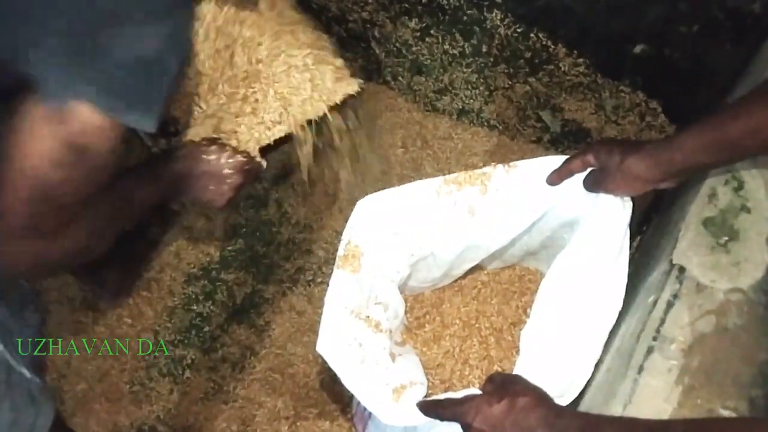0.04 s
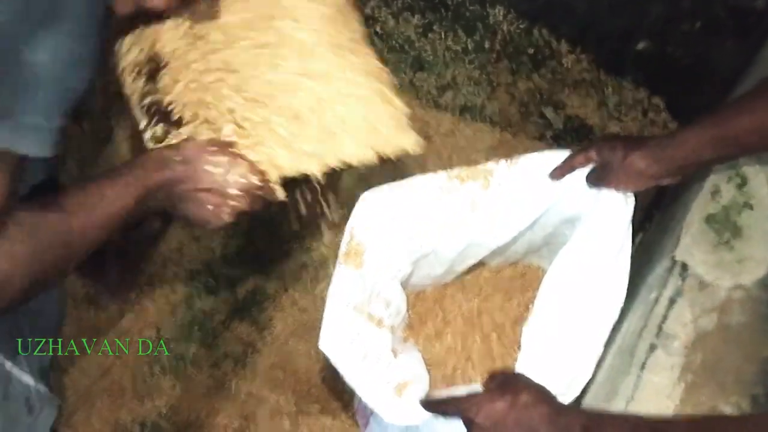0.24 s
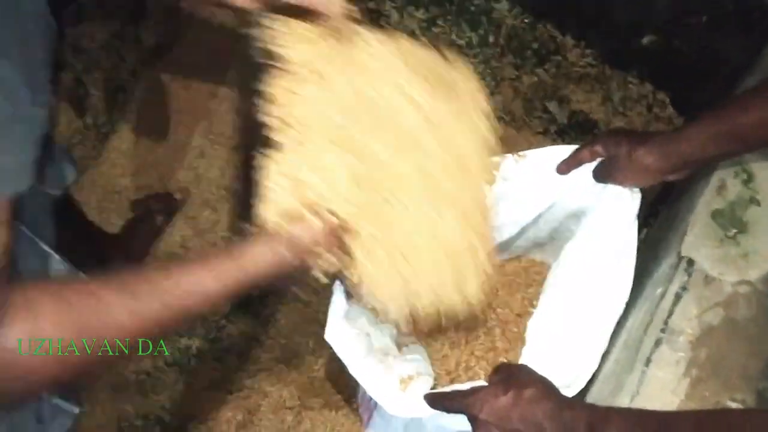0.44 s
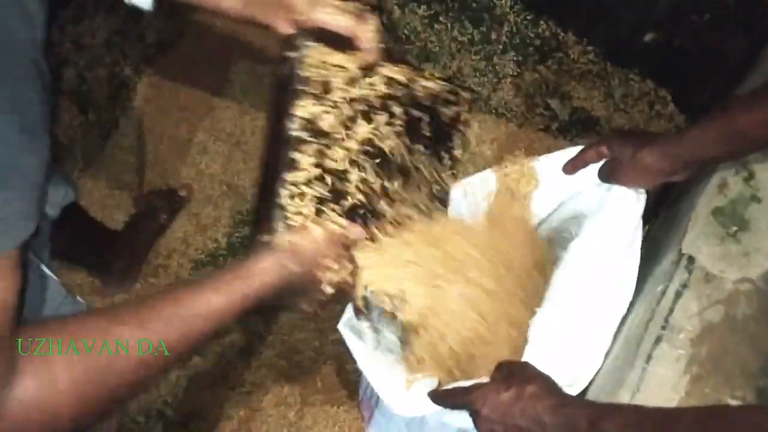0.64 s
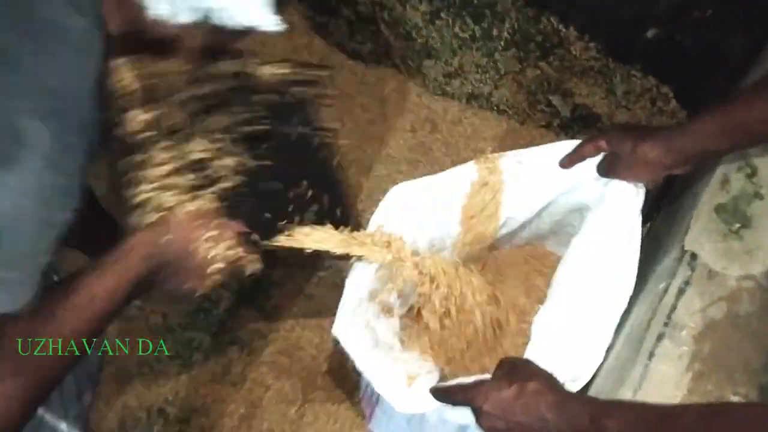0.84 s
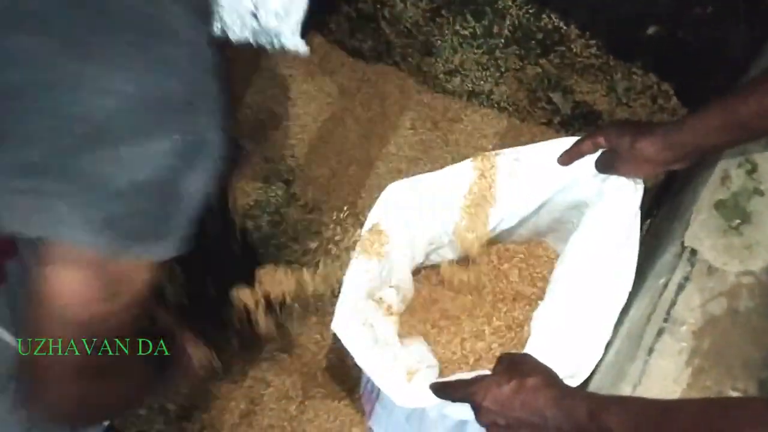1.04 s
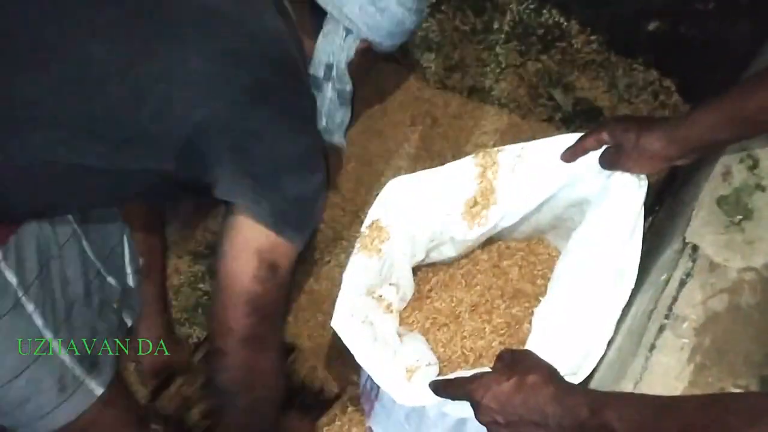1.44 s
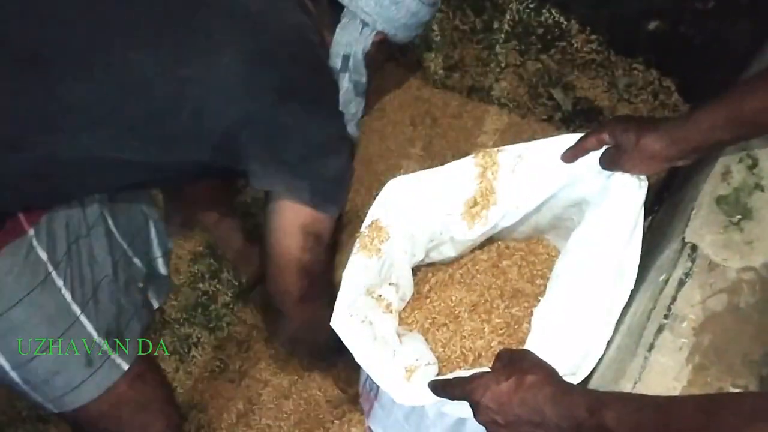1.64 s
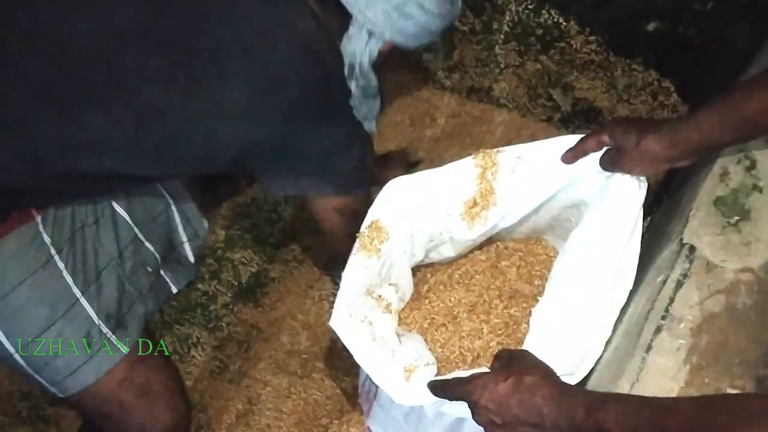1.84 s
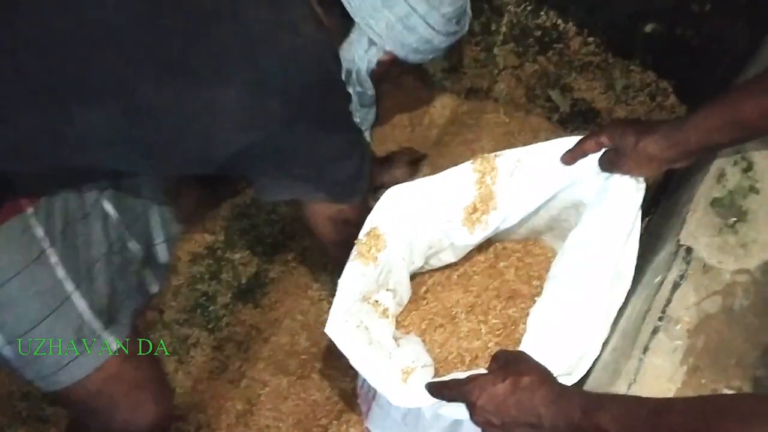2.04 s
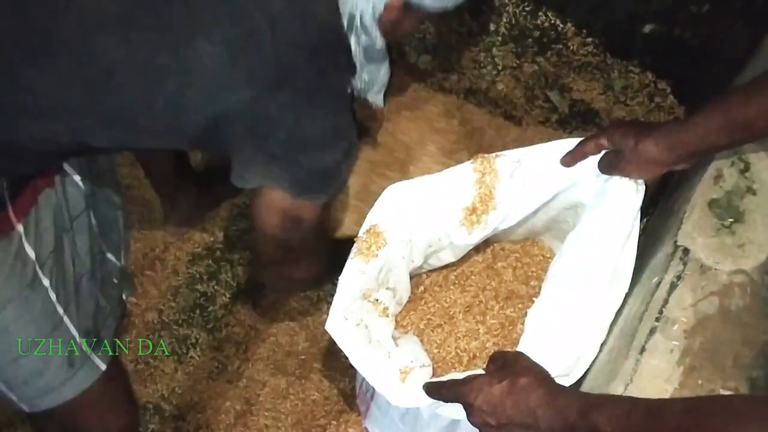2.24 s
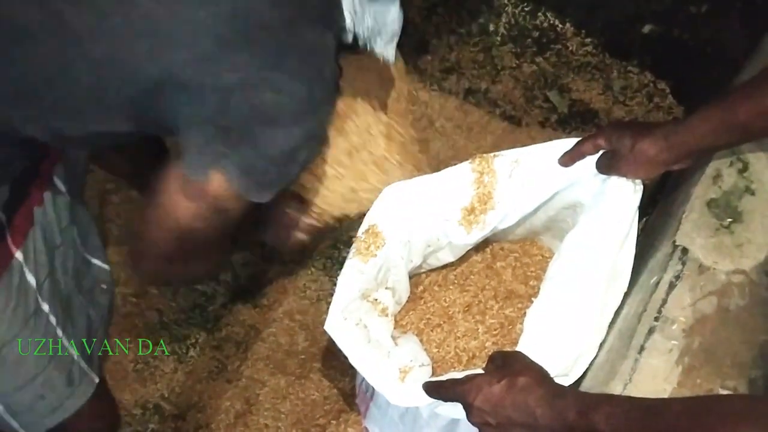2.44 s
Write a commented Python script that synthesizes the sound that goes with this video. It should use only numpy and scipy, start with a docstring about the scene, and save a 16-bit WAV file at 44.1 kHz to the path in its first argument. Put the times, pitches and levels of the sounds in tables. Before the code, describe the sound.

Close to the microphone outdoors, dry grain pours hissing into a sack and thins to a trickle. A scoop then pushes through the heap with a crunch, a brief rising scrape and light knocks, followed by coarser raking.

```python
"""Dry grain pours from a scoop into a woven sack, outdoors and close by.
Thousands of tiny impacts add up to a hiss off the scoop and a patter in the sack, where clumps excite
low, damped modes. After the last trickle the scoop is driven into the heap, crunching, knocking and
droning by friction, and more grain is raked onto it. A dull boom and a faint rustle lie underneath."""
import sys
import numpy as np
from scipy import signal
from scipy.fft import rfft, irfft
from scipy.io import wavfile
from scipy.ndimage import uniform_filter1d

SR = 44100
rng = np.random.default_rng(int(sys.argv[2]) if len(sys.argv) > 2 else 0)


def transcribe(u):
    """Save the signal u as a 16-bit wav file named by the first command-line argument.

    u: samples, shape (n,) or (channels, n), limited to [-1, 1]; the rate is SR.
    q: integer samples, one column per channel.
    """
    v = np.clip(np.atleast_2d(u).T, -1, 1)
    q = np.round(v * 32767).astype(np.int16)
    wavfile.write(sys.argv[1], SR, q)


N = 110250
TIME = np.arange(N) / SR
FREQS = np.maximum(np.arange(N // 2 + 1) * SR / N, 1)


# grain leaving the scoop: (time [s], rush level [dB], hiss level [dB])
SLIDING = [(0.17, -57, -49.5), (0.25, -37.5, -41), (0.40, -42.5, -50), (0.46, -41, -35),
           (0.52, -42.5, -32.5), (0.555, -28, -29), (0.62, -29, -26.5), (0.755, -36, -31.5),
           (0.88, -56, -45.5), (1.0, -56, -42.5), (1.13, -48, -43.5), (1.21, -50.5, -50.5)]
# spectra of the rush and the hiss: (frequency [Hz], gain [dB])
RUSH_SPECTRUM = [(500, -23), (1200, -2.5), (1950, 4.5), (3100, -2), (4300, -2), (6000, -1.5), (10000, -20)]
SLIDE_HISS_SPECTRUM = [(1500, -32), (4800, -15.5), (6500, 0.5), (8000, -1.5), (10000, -1), (14000, -1),
                       (16000, -3.5)]
# the scoop swinging past: (time [s], leftward pan [dB])
SWING = [(0.3, 0), (0.62, 1.5), (0.85, -6), (1.2, -8.5)]

def sliding():
    """Superposition: dense impacts merge into a rush and a hiss as the load slides off the scoop."""
    rush, hiss = envelopes(SLIDING)
    lag_s = 0.00003  # the raised scoop is near the middle
    rush = rush * shower(RUSH_SPECTRUM, per_s=11000, clump_db=0, shade=0.5, lag_s=lag_s)
    hiss = hiss * shower(SLIDE_HISS_SPECTRUM, per_s=21000, clump_db=0.9, shade=0.46, lag_s=lag_s)
    return from_db(5.5) * (rush + hiss) * pan(np.interp(TIME, *np.transpose(SWING)))


# grain landing in the sack: (time [s], level [dB])
LANDING = [(0.185, -58), (0.2, -35.5), (0.26, -35), (0.36, -28), (0.396, -33), (0.42, -28.5), (0.45, -33.5),
           (0.52, -36), (0.55, -34.5), (0.62, -31), (0.7, -27.5), (0.775, -30), (0.812, -30), (0.9, -34.5),
           (0.95, -33), (1.02, -32), (1.18, -40), (1.23, -47.5), (1.3, -55)]
# spectrum of the patter: (frequency [Hz], gain [dB])
LANDING_SPECTRUM = [(150, -14), (200, -0.5), (330, -4.5), (560, -0.5), (730, 1.5), (950, -2), (1300, 0.5),
                    (1600, -2), (1950, -0.5), (3100, -5), (4300, -4), (7000, -15.5), (15000, -22.5)]
# the sack's hollow under the main load: (time [s], level [dB], frequency [Hz])
HOLLOW = [(0.54, -45, 851), (0.62, -33.5, 750), (0.69, -34, 624), (0.77, -55, 566)]

def landing():
    """Cavity resonance: grain patters into the sack, whose hollow rings at a falling pitch."""
    level, = envelopes(LANDING)
    patter = level * shower(LANDING_SPECTRUM, per_s=8000, clump_db=1.56, shade=0.75, lag_s=0.00012)
    return from_db(3.5) * patter + resonance(HOLLOW, width_hz=55, pan_db=-1.5)


# clumps and soft bumps on the sack: (time [s], level [dB], leftward pan [dB])
THUDS = [(0.305, -32, 5), (0.35, -27, 6), (0.425, -26, 21), (0.778, -23.5, 18), (1.785, -34, 3),
         (1.886, -28, 17), (2.259, -34, -3)]
# modes of the sack: (frequency [Hz], gain [dB], 60 dB decay time [s])
SACK_MODES = [(105, -8.5, 0.088), (155, -5, 0.048), (189.5, -6.5, 0.12), (262, -5, 0.093), (390, -4, 0.033),
              (563, -4.5, 0.038)]

def sack_thuds():
    """Modal vibration: each soft blow excites the sack's low modes, slightly detuned every time."""
    thuds = np.zeros((2, N))
    for start, level_db, pan_db in THUDS:
        for hz, mode_db, t60 in SACK_MODES:
            detuned_hz = hz * (1 + 0.059 * rng.standard_normal())
            ring = damped_mode(start, detuned_hz, t60, contact_s=0.0022)
            thuds += from_db(level_db + mode_db - 4.5) * pan(pan_db) * ring
    return at_ports(*rfft(thuds))


# the scoop pushed through the heap: (time [s], crunch level [dB], hiss level [dB])
DIGGING = [(1.21, -48.5, -54), (1.23, -47.5, -40), (1.292, -45, -44), (1.302, -44, -33.5),
           (1.32, -35.5, -36.5), (1.36, -42.5, -40.5), (1.405, -41.5, -39.5), (1.452, -36, -30.5),
           (1.56, -32, -27), (1.65, -28.5, -24), (1.73, -27, -25.5), (1.81, -26.5, -25.5), (1.88, -33, -31),
           (1.95, -34.5, -37), (1.98, -42.5, -46), (2.1, -48.5, -74)]
# spectra of the crunch and of the husks' hiss: (frequency [Hz], gain [dB])
DIGGING_SPECTRUM = [(150, -20), (260, 1), (520, 1.5), (730, 4), (950, 1), (1300, 0), (1900, 3), (2500, 3),
                    (3600, -3), (6000, -11.5), (15000, -8)]
HUSK_SPECTRUM = [(1500, -17.5), (4000, -2.5), (6200, 1.6), (10000, 0), (14000, -0.5), (16000, -3)]

def digging():
    """Granular friction: husks crunch and hiss along the scoop as it enters the heap."""
    crunch, hiss = envelopes(DIGGING)
    crunch = crunch * shower(DIGGING_SPECTRUM, per_s=4000, clump_db=0.93, shade=0.65)
    hiss = hiss * shower(HUSK_SPECTRUM, per_s=16000, clump_db=0.9, shade=0.77)
    return from_db(4.5) * (crunch + hiss)


# the edge's low scrape and the scoop's two resonances: (time [s], level [dB], frequency [Hz])
EDGE_SCRAPE = [(1.3, -53.5, 310), (1.62, -38, 305), (1.78, -51, 285.4)]
LOWER_DRONE = [(1.4, -43.5, 440.6), (1.6, -38, 535), (1.635, -31, 554), (1.665, -24.5, 585.8),
               (1.705, -25.5, 596.7), (1.745, -32, 621), (1.81, -35.5, 635), (1.98, -49.5, 635)]
UPPER_DRONE = [(1.6, -45, 880), (1.68, -33, 928), (1.79, -34, 1013), (1.9, -42, 1044)]

def scoop_drone():
    """Frictional excitation: the edge scrapes under the heap and the scoop drones higher as it fills."""
    return (resonance(EDGE_SCRAPE, width_hz=49, pan_db=0)
            + resonance(LOWER_DRONE, width_hz=66, pan_db=1)
            + resonance(UPPER_DRONE, width_hz=66, pan_db=5))


# knocks and catches of the scoop: (time [s], level [dB], frequency [Hz], 60 dB decay time [s])
KNOCKS = [(0.267, -24.5, 470, 0.029), (0.263, -24.5, 192, 0.093), (0.301, -22.5, 533, 0.049),
          (0.429, -23, 357, .012), (0.786, -20.5, 293, 0.021), (1.308, -32.5, 438, 0.052),
          (1.643, -16.5, 511, 0.026), (1.656, -15, 570, 0.044), (1.731, -19.5, 1000, 0.059),
          (1.768, -21, 606, 0.028), (1.915, -26, 390, 0.018), (1.949, -21.5, 478, 0.032),
          (2.2004, -27, 950, 0.01), (2.209, -24.5, 415, 0.011), (2.2576, -26.5, 380, 0.0085)]

def knocks():
    """Free vibration: short knocks and catches on the scoop, with one low thump from the hand's grip."""
    rings = sum(from_db(db) * damped_mode(start, hz, t60, contact_s=0.0013)
                for start, db, hz, t60 in KNOCKS)
    spectrum = rfft(rings)
    return at_ports(spectrum, spectrum)


# grain raked onto the scoop: (time [s], crunch level [dB], hiss level [dB])
RAKING = [(2.152, -49.5, -58), (2.172, -34.5, -43), (2.205, -36, -36.5), (2.25, -36, -48.5),
          (2.3, -37.5, -57), (2.335, -36, -52), (2.4, -39, -48), (2.44, -43, -52), (2.5, -41.5, -54)]
# spectrum of its crunch: (frequency [Hz], gain [dB])
RAKING_SPECTRUM = [(150, -10), (200, 9), (350, -2), (520, 2), (700, -1), (950, 1.5), (1400, 2.5),
                   (1900, 3.5), (3100, -1), (6000, -8), (15000, -31)]

def raking():
    """Impact noise: sparser collisions give a coarser crunch as grain is swept onto the scoop."""
    crunch, hiss = envelopes(RAKING)
    crunch = crunch * shower(RAKING_SPECTRUM, per_s=2600, clump_db=1.55, shade=1.36)
    hiss = hiss * shower(HUSK_SPECTRUM, per_s=7700, clump_db=1.2, shade=1)
    return from_db(2.5) * crunch + from_db(7) * hiss


# short sprays of grain: (time [s], level [dB])
SPRAYS = [(0.264, -25.5), (0.346, -31), (0.539, -27), (0.94, -28), (1.02, -27), (1.219, -45), (1.299, -41),
          (1.945, -31), (2.199, -23), (2.332, -32)]
# their spectrum: (frequency [Hz], gain [dB])
SPRAY_SPECTRUM = [(300, -5), (1000, 4), (2000, 5), (5000, 3.5), (9000, 3), (15000, -41)]

def sprays():
    """Broadband transients: handfuls of grain strike almost at once."""
    level = sum(from_db(db) * burst(start, attack_s=0.0011, decay_s=0.011) for start, db in SPRAYS)
    return level * shower(SPRAY_SPECTRUM, per_s=4600, clump_db=2, shade=1)


# dull boom under the handling: (time [s], level [dB])
BOOM = [(0, -57), (0.19, -62), (0.29, -35), (0.45, -45), (0.649, -49), (0.86, -47), (1.2, -52.5),
        (1.899, -52), (2.13, -57), (2.281, -47.5), (2.5, -53)]

def boom(hz=200.4):
    """Narrowband noise: one low resonance swells and fades at a steady pitch."""
    return resonance([(time, db, hz) for time, db in BOOM], width_hz=23.3, pan_db=-2)


# loose grain settling: (time [s], level [dB])
SETTLING = [(0, -38.5), (0.15, -38.5), (1.0, -41), (2.1, -43), (2.5, -41.5)]
# spectrum of rustle and air: (frequency [Hz], gain [dB])
SETTLING_SPECTRUM = [(30, -14), (140, -12), (200, 2.5), (450, -2), (1300, -6.5), (3800, -4), (5500, -3),
                     (7700, 0.5), (15500, -3.5)]

def settling():
    """Noise floor: the tiny impacts of settling grain blend into a faint, continuous rustle."""
    level, = envelopes(SETTLING)
    return level * shower(SETTLING_SPECTRUM, per_s=13000, clump_db=1, shade=0.65)


def from_db(db):
    """Amplitude ratio: a factor of ten for every 20 dB."""
    return 10 ** (np.asarray(db) / 20)


def rms_one(x):
    """Normalisation to unit mean power."""
    return x / np.sqrt(np.mean(x ** 2) + 1e-20)


def pan(db):
    """Level difference: left and right gains that lie db apart."""
    return from_db(np.vstack([db, -db]) / 2)


def envelopes(rows):
    """Amplitude envelopes, one per level column, falling exponentially outside the gesture."""
    times, *levels = np.transpose(rows)
    outside_s = np.maximum(times[0] - TIME, 0) + np.maximum(TIME - times[-1], 0)
    return [from_db(np.interp(TIME, times, db)) * np.exp(-outside_s / 0.047) for db in levels]


def over_hz(points):
    """Interpolation along log frequency."""
    hz, value = np.transpose(points)
    return np.interp(np.log(FREQS), np.log(hz), value)


def drift(hz):
    """Low-pass Gaussian noise of unit rms."""
    return rms_one(irfft(rfft(rng.standard_normal(N)) / (1 + (FREQS / hz) ** 2), N))


def burst(start, attack_s, decay_s):
    """Transient envelope: a quick rise and an exponential decay."""
    age = np.maximum(TIME - start, 0)
    return (1 - np.exp(-age / attack_s)) * np.exp(-age / decay_s)


def damped_mode(start, hz, t60, contact_s):
    """Damped oscillator: it swells under a soft contact and dies away; the envelope peaks at 1."""
    shape = burst(start, contact_s, t60 / np.log(1000))
    return shape / (shape.max() + 1e-12) * np.sin(2 * np.pi * hz * (TIME - start))


def resonance(rows, width_hz, pan_db, evenness=0.36):
    """Narrowband noise: a wavering tone follows a pitch curve, its loudness swings partly smoothed."""
    times, db, hz = np.transpose(rows)
    level, = envelopes(np.transpose([times, db]))
    phase = 2 * np.pi * np.cumsum(np.interp(TIME, times, hz)) / SR
    swing = drift(width_hz) + 1j * drift(width_hz)
    evened = swing / np.abs(swing) ** evenness
    tone = rfft(level * rms_one(np.real(evened * np.exp(1j * phase))))
    return at_ports(tone, tone) * pan(pan_db)


def impacts(per_s, spread_db=2):
    """Poisson process: the spectrum of randomly timed impulses of uneven size."""
    sizes = from_db(spread_db * np.minimum(rng.exponential(1, N), 5)) * rng.choice([-1, 1], N)
    return rfft(rms_one(sizes * (rng.random(N) < per_s / SR)))


def reflections(echoes, dull_hz=9200):
    """Comb filtering: direct sound interferes with its duller echoes, at unchanged mean power."""
    dull = 1 / (1 + (FREQS / dull_hz) ** 4)
    paths = 1 + dull * sum(gain * np.exp(-2j * np.pi * FREQS * delay) for delay, gain in echoes)
    return paths / np.sqrt(1 + dull ** 2 * sum(gain ** 2 for _, gain in echoes))


# likeness of the two microphone ports: (frequency [Hz], shared power [fraction])
COHERENCE = [(200, 1), (950, 0.86), (1400, 0.51), (2000, 0.19), (5000, 0.093)]
# reflections off ground, sack and scoop: (delay [s], amplitude [ratio to direct sound])
LEFT_ECHOES = [(.00208, 0.2), (.0043, 0.17), (.0071, .2), (.0118, 0.14)]
RIGHT_ECHOES = [(.00215, 0.2), (.0037, 0.23), (.0062, 0.23), (0.01, 0.15)]
LEFT_LAG_S = 0.00014

def shower(spectrum, per_s, clump_db, shade, lag_s=LEFT_LAG_S, clump_hz=57.5):
    """Shot noise from an extended source: clumpy grain impacts, coherent mainly in the lows."""
    coherence = np.clip(over_hz(COHERENCE), 0, 1)
    colour = from_db(over_hz(spectrum))
    shared = np.sqrt(coherence) * impacts(per_s)
    ports = []
    for echoes in (LEFT_ECHOES, RIGHT_ECHOES):
        separate = np.sqrt(1 - coherence) * impacts(per_s)
        ports.append(colour * reflections(echoes) * (shared + separate))
    clumping = from_db(clump_db * drift(clump_hz))
    return rms_one(at_ports(*ports, shade, lag_s) * clumping)


# port balance, and shading for a source well to the right: (frequency [Hz], left minus right [dB])
PORT_BALANCE = [(150, 3), (600, 1), (1500, 2.5), (2200, 4), (3200, 1.5), (5000, 1)]
SHADING = [(4000, -2), (6000, -5), (7500, -4.5), (9300, -14.5), (12000, -16.5), (15500, -13.5)]

def at_ports(left, right, shade=0, lag_s=LEFT_LAG_S):
    """Path difference and shadowing: two spectra become signals; the left lags and shade dulls it."""
    lean = from_db(over_hz(PORT_BALANCE) + shade * over_hz(SHADING))
    lag = np.exp(-2j * np.pi * FREQS * lag_s)
    return irfft(np.array([left * lean * lag, right]) / np.sqrt((1 + lean ** 2) / 2), N)


def rumble(dry, hz=130):
    """Amplitude modulation: faint low noise, separate at each port, swells with the activity."""
    activity = np.sqrt(np.abs(uniform_filter1d(np.mean(dry ** 2, axis=0), size=2000)))
    return (from_db(-83) + from_db(-51) * activity) * np.array([drift(hz), drift(hz)])


def scene():
    """Linear superposition: pouring and scooping add to a dull boom and a faint rustle."""
    pouring = sliding() + landing() + sack_thuds()
    scooping = digging() + scoop_drone() + raking()
    return pouring + scooping + knocks() + sprays() + boom() + settling()


def record(dry, low_cut_hz=141, top_hz=15900):
    """Band limiting: the left side dulls briefly, the bass is cut, rumble is added, the top is cut."""
    dip_at_s, dip_width_s, dip_above_hz = 0.82, 0.041, 250
    dip = 0.75 * np.exp(-((TIME - dip_at_s) / dip_width_s) ** 2)
    bass = signal.sosfilt(signal.butter(1, dip_above_hz, fs=SR, output="sos"), dry[0])
    left = dry[0] - dip * (dry[0] - bass)
    low_cut = signal.butter(6, low_cut_hz, "high", fs=SR, output="sos")
    thin = signal.sosfilt(low_cut, np.array([left, dry[1]]))
    top_cut = 1 / np.sqrt(1 + (FREQS / top_hz) ** 800)
    return irfft(rfft(thin + rumble(dry)) * top_cut, N)


dry = scene()
out = record(dry)
transcribe(out)
```